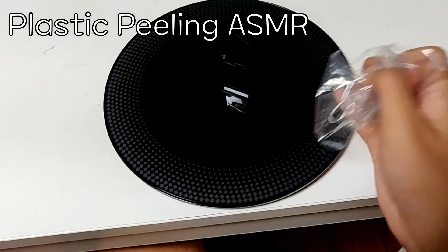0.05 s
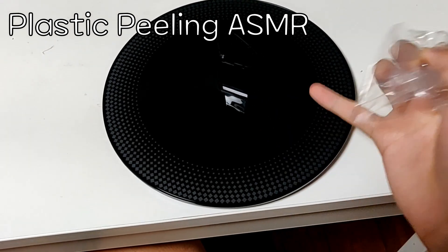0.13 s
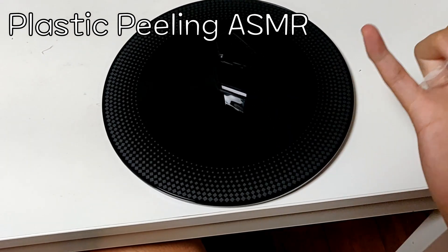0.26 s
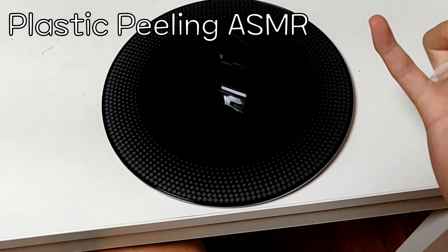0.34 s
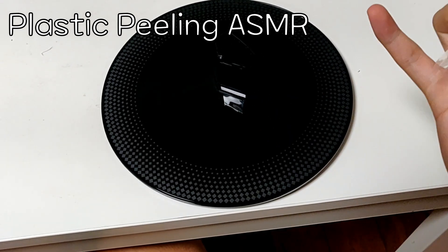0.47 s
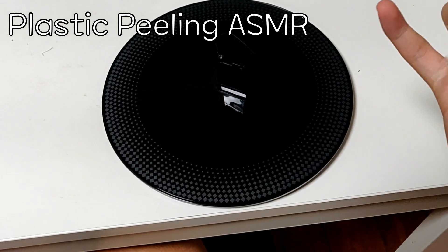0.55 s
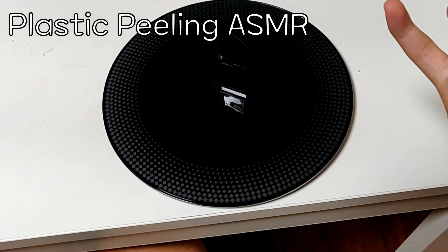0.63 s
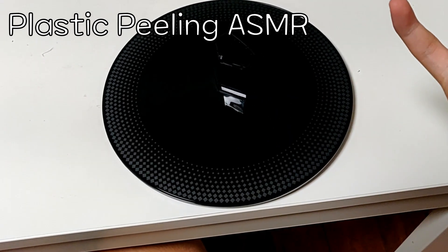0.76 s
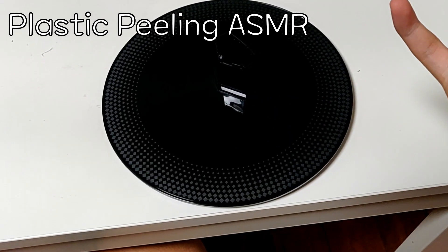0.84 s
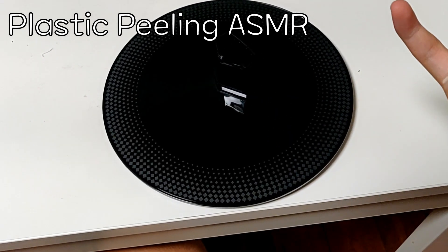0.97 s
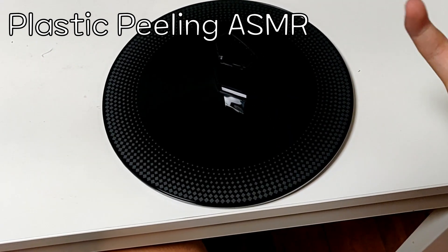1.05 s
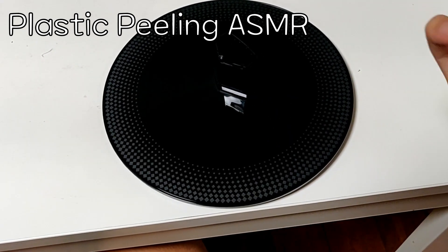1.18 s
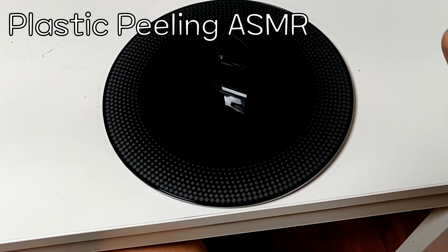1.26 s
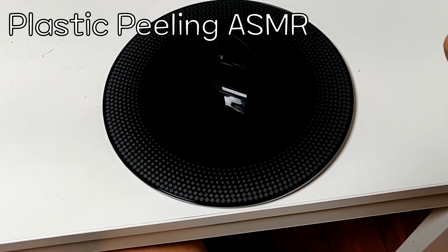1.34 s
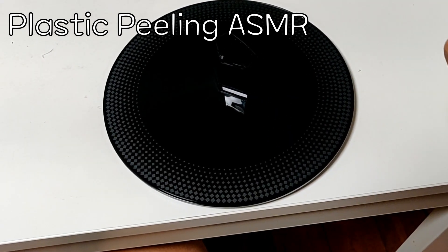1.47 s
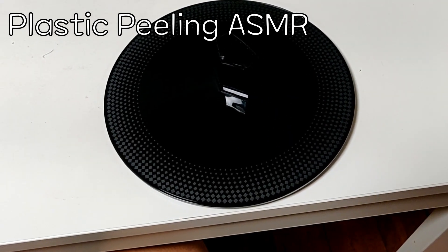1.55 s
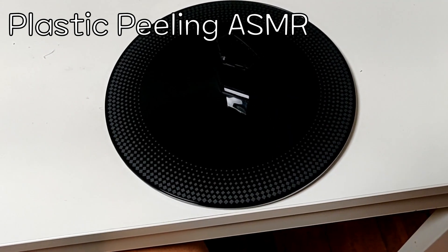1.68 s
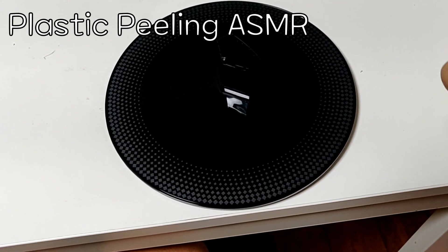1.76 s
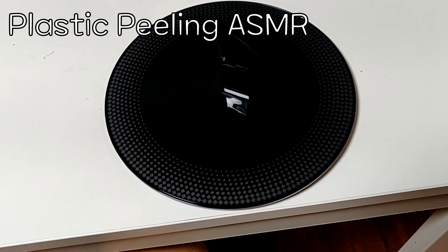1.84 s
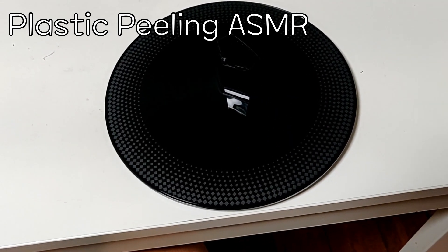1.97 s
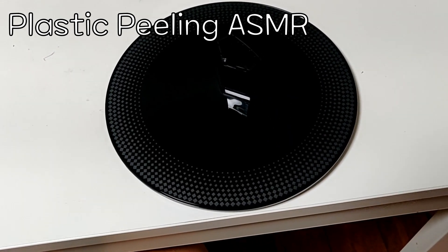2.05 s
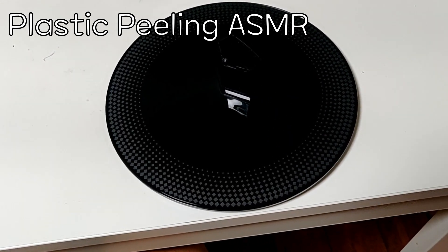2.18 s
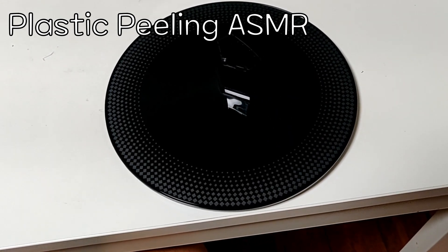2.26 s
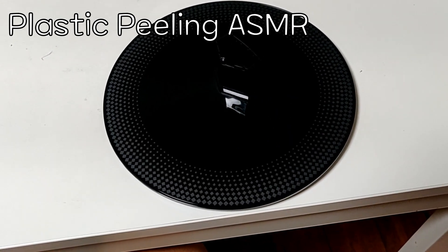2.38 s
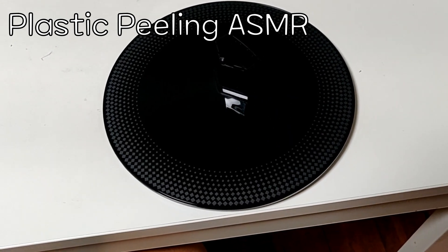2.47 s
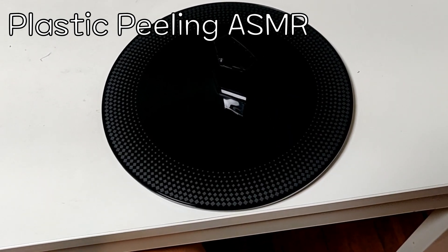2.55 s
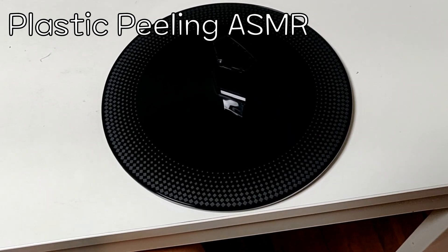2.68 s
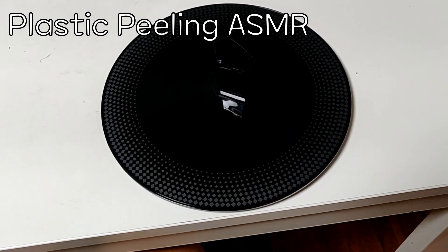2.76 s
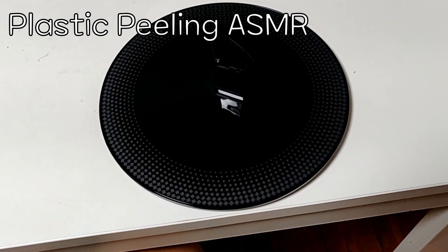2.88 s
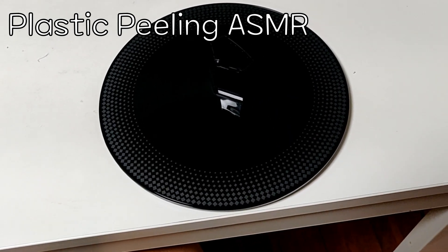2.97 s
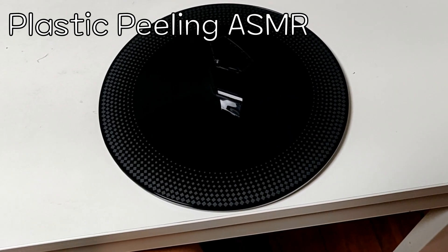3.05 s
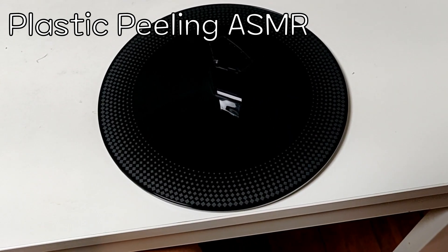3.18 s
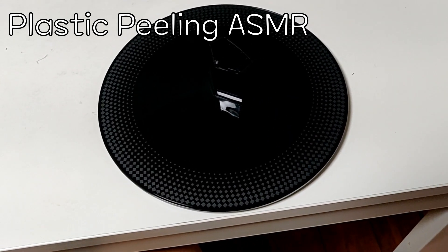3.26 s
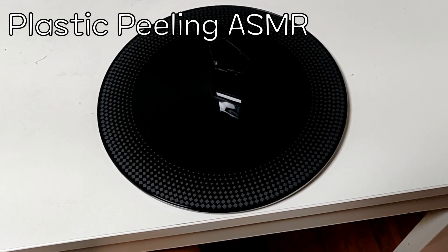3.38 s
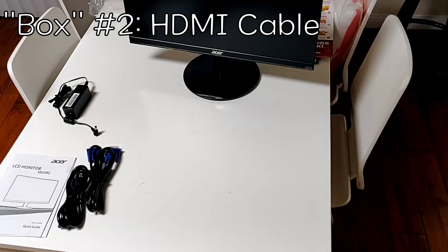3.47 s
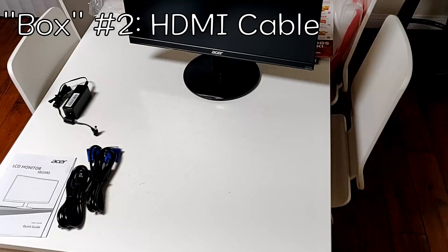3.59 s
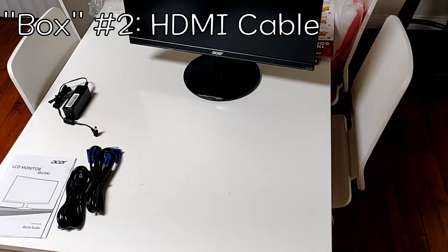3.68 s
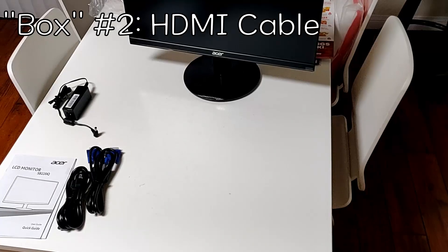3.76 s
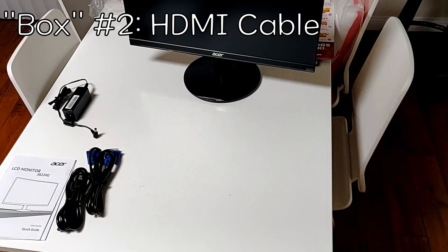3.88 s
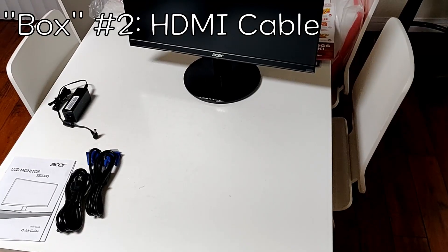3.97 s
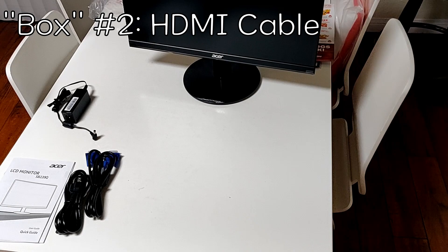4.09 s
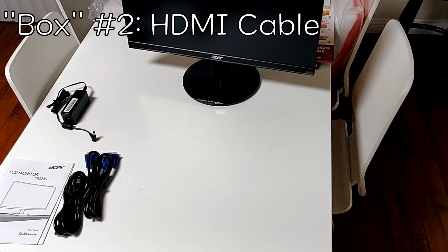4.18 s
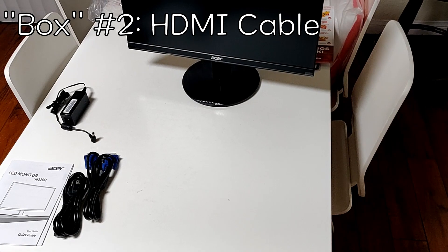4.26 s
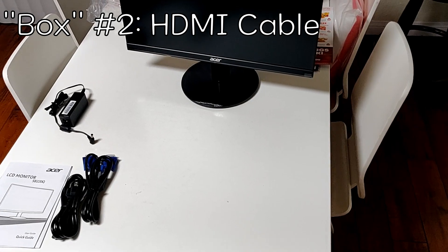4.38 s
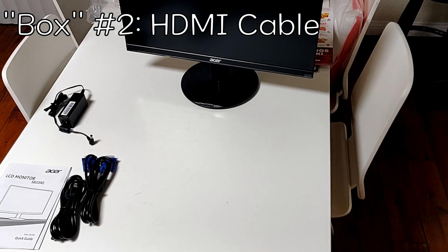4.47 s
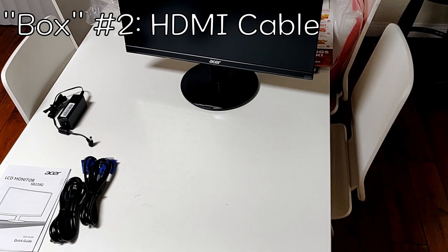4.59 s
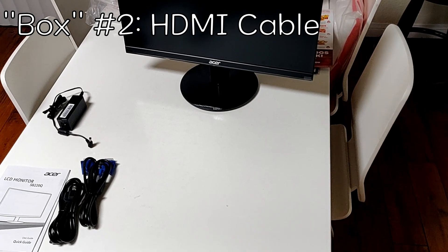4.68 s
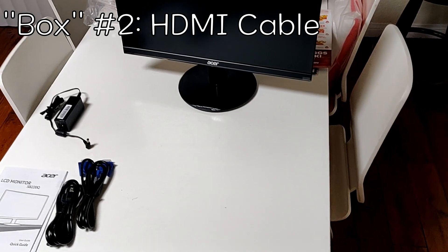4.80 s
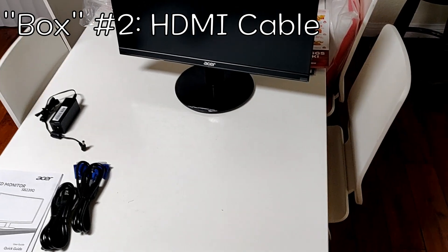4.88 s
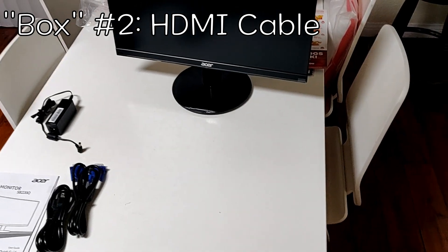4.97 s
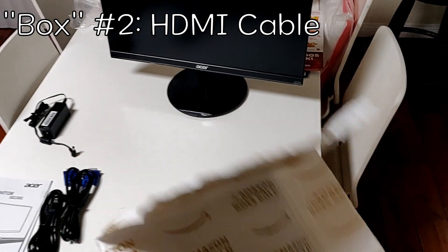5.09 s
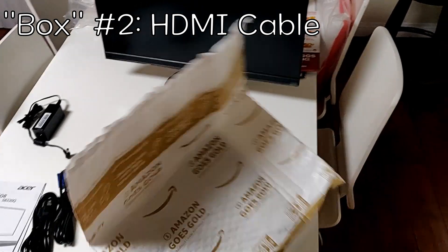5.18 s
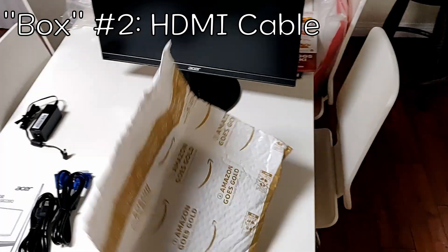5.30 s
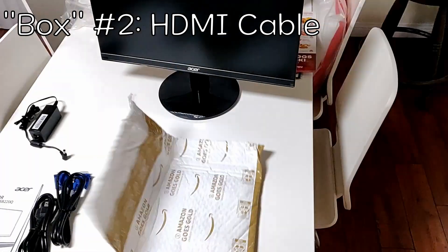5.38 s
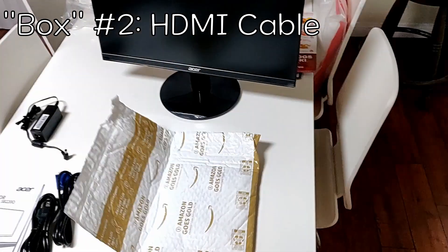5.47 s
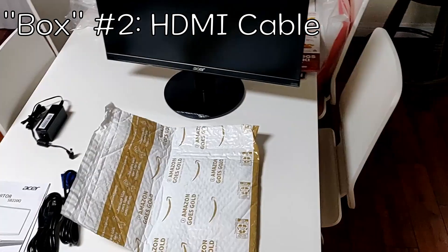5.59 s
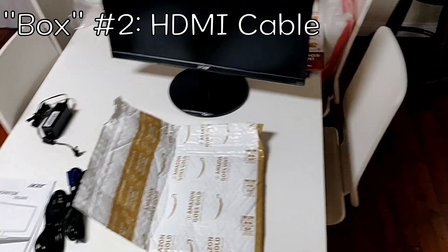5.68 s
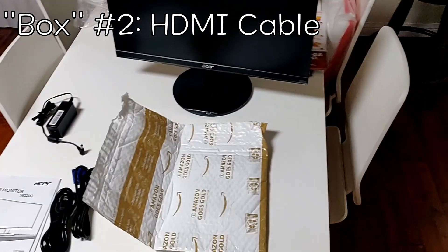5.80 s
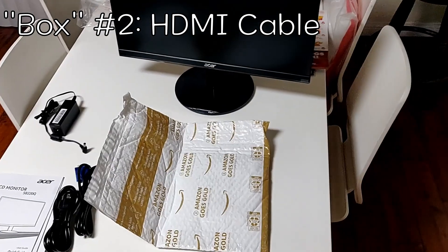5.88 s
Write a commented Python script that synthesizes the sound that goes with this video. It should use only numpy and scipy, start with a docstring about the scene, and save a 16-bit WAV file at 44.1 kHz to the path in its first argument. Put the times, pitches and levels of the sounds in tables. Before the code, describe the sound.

Close, crisp plastic crinkling with sharp snaps and tiny rips, a brief silence, then faint rustling and one flat smack on a tabletop.

```python
"""Clear film is peeled off a glossy plastic stand and crumpled in a hand that ends up by the right microphone.
Each crease snaps with a bright tick and a short ring; quick runs of slips make rips, falling tones make squeaks.
The hand adds dull rubs of noise and soft pushes of air into the microphone ports.
After a short silence, in a live room, a padded envelope rustles as shaped noise and slaps down on a table,
whose top rings as fading tones. Quiet room air lies behind both."""
import sys
import numpy as np
from scipy import signal
from scipy.fft import rfft, irfft, next_fast_len
from scipy.io import wavfile
from scipy.ndimage import uniform_filter1d

SR = 44100
rng = np.random.default_rng(int(sys.argv[2]) if len(sys.argv) > 2 else 0)


def persist_wave(psi):
    """Save psi, clipped to +-1, as 16-bit WAV."""
    counts = np.round(np.clip(psi, -1, 1) * 32767).astype(np.int16)
    wavfile.write(sys.argv[1], SR, np.atleast_2d(counts).T)


N = 261943  # length in samples

# where the film is: (time [s], left over right [dB])
FILM_PLACE = [(0, 10), (1.0, 5.5), (2.07, 7.5), (2.13, -2), (2.45, -2), (2.65, -9.5), (3.4, -1.5)]
# squeezes of the hand, levels before later trims: (time [s], hold [s], ring level [dB], tick level [dB])
HAND_SQUEEZES = [(0.025, 0.048, -41, -43), (0.105, 0.082, -38.5, -38), (0.33, 0.018, -44, -41.5),
                 (0.45, 0.0076, -47, -47.5), (0.6, 0.0083, -54.5, -58), (0.7, 0.21, -72, -67.5),
                 (1.01, 0.012, -65.5, -74.5), (1.122, .07, -46.5, -48), (1.35, 0.073, -44, -46.5),
                 (1.505, 0.0083, -38, -37.5), (1.595, 0.0071, -53, -48), (1.66, 0.16, -48, -46.5),
                 (1.84, 0.099, -40.5, -43), (1.95, 0.026, -37.5, -38), (2.15, 0.069, -45.5, -44),
                 (2.38, 0.017, -46.5, -45), (2.52, 0.088, -53, -52.5), (2.73, 0.0095, -49, -61.5),
                 (3.02, 0.021, -60, -71)]
# spectrum of soft rubbing, only its shape matters: (frequency [Hz], density [dB per Hz])
RUB_SPECTRUM = [(60, -11), (250, 0), (800, -1), (1500, -7), (3000, -22), (9000, -26.5)]
# how alike the two sides of a noise are: (frequency [Hz], likeness [-1 to 1])
SIDE_LIKENESS = [(250, 0.96), (600, 0.49), (1500, 0)]

SILENCE_START_S, SILENCE_END_S = 3.5, 3.595
GRIP_DB_PER_S = 400  # how fast a squeeze builds
SNAP_PAN_DB = 4  # snaps lie a little to the left of the crinkling


def amp(db):
    """Turn decibels into a gain."""
    return 10 ** (np.asarray(db) / 20)


def unit(x):
    """Scale to an average (rms) strength of 1."""
    return x / np.sqrt(np.mean(x ** 2) + 1e-20)


def along(points, hz):
    """Read a (frequency, value) curve on a logarithmic frequency axis."""
    f, v = np.transpose(points)
    return np.interp(np.log(hz + 1), np.log(f + 1), v)


def curves(rows, at):
    """Read each column after the time column at the given times."""
    s, *columns = np.transpose(rows)
    return [np.interp(at, s, column) for column in columns]


def add(track, s, sound):
    """Mix a sound into a track at time s."""
    part = track[..., max(0, round(s * SR)):][..., :sound.shape[-1]]
    part += sound[..., :part.shape[-1]]


def colour(x, points, keep_power=True, size=4096):
    """Filter with the given spectrum, with no sound ahead of its cause."""
    gain = amp(along(points, np.fft.rfftfreq(size, 1 / SR)))
    cepstrum = irfft(np.log(unit(gain) if keep_power else gain))
    # folding the cepstrum forward packs the response as early as it can be
    cepstrum[1:size // 2] *= 2
    cepstrum[size // 2 + 1:] = 0
    response = irfft(np.exp(rfft(cepstrum)))
    return signal.fftconvolve(x, response[None], axes=1)[:, :x.shape[1]]


def pair(alike, size):
    """White noise on both sides, as alike as the curve says at each frequency."""
    likeness = np.clip(along(alike, np.fft.rfftfreq(size, 1 / SR)), -1, 1)
    turn = np.arccos(likeness) / 2
    mid, side = rfft(rng.standard_normal((2, size))) * [np.cos(turn), np.sin(turn)]
    return irfft([mid + side, mid - side], size)


def sides(pan_db):
    """Left and right gains of constant power; positive leans left."""
    ratio = amp(pan_db)
    return np.array([ratio, np.ones_like(ratio)]) * np.sqrt(2 / (1 + ratio ** 2))


def arch(length):
    """Time and a rounded swell over one stroke."""
    t = np.arange(int(length * SR)) / SR
    return t, np.sqrt(np.abs(np.sin(np.pi * t / length)))


def swells(rows, at, rise_db, fall_db, rest_db):
    """Two levels [dB] from strokes (time, hold, level, level) that rise, hold and fall at set dB per second."""
    s, hold, *levels = np.transpose(rows)[:, :, None]
    early = np.maximum(s - at, 0)
    late = np.maximum(at - s - hold, 0)
    shape = -rise_db * early - fall_db * late
    return [10 * np.log10(np.sum(amp(db + shape) ** 2, axis=0) + amp(rest_db) ** 2) for db in levels]


def film():
    """Film creases ring and tick, and its squeaks join them; the cavity of each port then colours the sum."""
    # runs of stick-slip: (time [s], length [s], slips [per s], ring level [dB], ring pitch [Hz],
    # tick level [dB], tick pitch [Hz])
    rip_rows = [(0.077, 0.041, 900, -30, 2258, -29.5, 6280), (0.093, 0.046, 370, -24.5, 1000, -38, 6450),
                (0.36, 0.014, 380, -35, 2600, -38.5, 6520), (0.443, 0.016, 850, -35.5, 1120, -45, 6510),
                (1.128, 0.0097, 890, -38.5, 950, -45, 7110), (1.17, .022, 403, -40, 804, -54, 6567),
                (1.508, 0.041, 580, -33.5, 3600, -47.5, 6550), (1.594, 0.015, 1010, -37, 3313, -37, 6500),
                (1.867, .016, 900, -33, 2147, -42, 9070), (2.125, .016, 980, -53.5, 3000, -27.5, 12480),
                (2.232, 0.014, 580, -44.5, 1600, -33, 11690),
                (2.419, 0.017, 710, -39.5, 1800, -42.5, 11990)]
    # tick spectrum, only its shape matters: (frequency [Hz], density [dB per Hz])
    tick_spectrum = [(300, -28.5), (2000, -3), (6000, -3.5), (10000, -4.5), (16000, 2)]
    # how well the film gives off its ringing: (frequency [Hz], gain [dB])
    radiation_gain = [(150, -9), (600, -4.5), (1400, 1), (2100, 5), (3000, -3), (4200, -2)]
    # cavities of the two ports: (frequency [Hz], gain [dB])
    left_cavity = [(5000, -2), (6300, 7), (8000, -8.5), (9500, -15), (12000, -12.5), (15500, -4)]
    right_cavity = [(5000, 0), (7300, 2.5), (9200, 14.5), (11500, 4.5), (15500, 8)]
    creases = np.hstack([snaps(), strays(), crinkle()] + [rip(*row) for row in rip_rows])
    rings, ticks = facets(*creases)
    sound = colour(rings, radiation_gain, keep_power=False) + colour(ticks, tick_spectrum) + squeaks()
    left = colour(sound[:1], left_cavity, keep_power=False)
    right = colour(sound[1:], right_cavity, keep_power=False)
    return np.vstack([left, right])


def snaps():
    """The clear snaps, where creases pop out one by one, follow the place where the film is held."""
    # levels before colouring: (time [s], ring level [dB], ring pitch [Hz], tick level [dB], tick pitch [Hz])
    snap_rows = [(0.024, -53.5, 4930, -40.5, 6460), (0.071, -44, 3850, -37, 10830),
                 (0.0835, -38, 2200, -24, 13000), (0.206, -39.5, 2130, -30, 6950),
                 (0.291, -44, 2260, -38.5, 6544), (0.3006, -33.5, 5060, -44.5, 5880),
                 (0.3334, -42.5, 2240, -36, 6900), (0.348, -29.5, 2240, -28.5, 6540),
                 (0.3633, -25.5, 3470, -21.5, 9440), (0.3654, -36.5, 2270, -32.5, 12620),
                 (0.4401, -27, 1060, -32.5, 13050), (0.5961, -40.5, 2950, -43, 7800),
                 (0.605, -39, 2050, -42, 8030), (0.726, -42, 3470, -37, 9160),
                 (0.837, -44, 3190, -56, 10530), (0.9866, -43.5, 3470, -46.5, 12880),
                 (1.0701, -38, 3100, -44, 9610), (1.1263, -33, 2050, -33.5, 13700),
                 (1.1348, -27.5, 3620, -44, 7210), (1.137, -29.5, 873, -51, 6980),
                 (1.1766, -36, 1700, -42, 11060), (1.1883, -43, 2683, -41, 13600),
                 (1.239, -44, 2020, -39, 6100), (1.3123, -36.5, 2070, -34, 9480),
                 (1.3402, -36.5, 2990, -45.5, 9010), (1.366, -35.5, 3600, -36.5, 7700),
                 (1.4023, -47.5, 2050, -36, 7680), (1.413, -35, 2350, -48, 6830),
                 (1.4197, -27, 2930, -33.5, 13070), (1.4249, -37, 2820, -30.5, 14480),
                 (1.4309, -34, 2890, -44.5, 11400), (1.4676, -35.5, 1940, -33, 8850),
                 (1.4884, -34.5, 1250, -29, 9655), (1.524, -28, 2710, -28, 5620),
                 (1.526, -30, 968, -45.5, 7000), (1.572, -53, 4740, -28, 14300),
                 (1.742, -36.5, 2200, -37.5, 8990), (1.841, -33, 1740, -32.5, 8810),
                 (1.8485, -32.5, 2090, -35, 12500), (1.8845, -19.5, 1890, -38, 5615),
                 (1.8995, -25, 1890, -30.5, 12460), (1.9551, -27, 2450, -35, 8040),
                 (1.9848, -34, 2296, -33.5, 12310), (2.0053, -31, 2170, -38.5, 11300),
                 (2.06, -36, 1890, -37.5, 11000), (2.0755, -40, 5480, -41, 5770),
                 (2.0921, -40.5, 2110, -27.5, 9400), (2.1451, -40.5, 1870, -25, 10800),
                 (2.2057, -46, 3830, -34, 9750), (2.2544, -57, 3400, -32, 8700),
                 (2.2801, -52.5, 3410, -40, 8900), (2.3046, -39, 1850, -34, 6810),
                 (2.3117, -44.5, 4900, -34.5, 13690), (2.3252, -35, 4540, -33.5, 6520),
                 (2.3411, -47.5, 2930, -32, 13620), (2.3774, -52, 2500, -34, 12800),
                 (2.3963, -33.5, 2220, -46.5, 11060), (2.4161, -40, 1700, -38.5, 15290),
                 (2.5017, -42, 3140, -37, 7410), (2.543, -37, 1680, -39.5, 9110),
                 (2.554, -36.5, 3770, -46, 6130), (2.562, -39.5, 4310, -42, 6795),
                 (2.5823, -37, 4480, -33, 9900), (2.6038, -28, 2200, -37, 8930),
                 (2.631, -39.5, 5360, -38.5, 7130), (2.6784, -34, 2390, -32.5, 13540),
                 (2.8089, -39.5, 2200, -41.5, 14030), (2.8311, -57, 3170, -48.5, 7410),
                 (2.8618, -45.5, 2150, -46.5, 7290), (2.869, -39.5, 1210, -45.5, 8560),
                 (2.8861, -50, 2110, -53.5, 6200), (2.9589, -50, 4740, -35, 15000),
                 (3.0173, -43, 1700, -43, 14470), (3.045, -32, 1290, -32, 13800),
                 (3.1394, -59.5, 3190, -57, 7820), (3.3266, -46, 2200, -51.5, 10900),
                 (3.3969, -53.5, 3980, -55.5, 6100)]
    columns = np.transpose(snap_rows)
    pan = curves(FILM_PLACE, columns[0])[0] + SNAP_PAN_DB
    return np.vstack([columns, pan])


def strays(follow=0.74, pivot_db=-45, boost_db=1, tick_db=1.5, spread_db=2.5,
           centre_hz=2600, tick_hz=8500, spread=0.34, count=90):
    """Middling creases flip at scattered times, louder during and after each squeeze."""
    s = (np.arange(count) + rng.random(count)) * SILENCE_START_S / count
    size, bright, pitch, tick_pitch = np.clip(rng.standard_normal((4, count)), -2, 2)
    # these larger creases go on springing back for longer than the tiny ones
    effort = np.array(swells(HAND_SQUEEZES, s, GRIP_DB_PER_S, fall_db=97.5, rest_db=-71))
    ring, tick = pivot_db + follow * (effort - pivot_db) + boost_db
    pan = curves(FILM_PLACE, s)[0] + SNAP_PAN_DB
    return np.array([s, ring + spread_db * size, centre_hz * np.exp(spread * pitch),
                     tick + tick_db + spread_db * bright, tick_hz * np.exp(spread * tick_pitch), pan])


def crinkle(ring_db=-2, tick_db=-3, spread_db=1.5, centre_hz=2400, tick_hz=9000, spread=.42, count=1400):
    """A crowd of tiny creases flips, as loud as the hand squeezes."""
    s = (np.arange(count) + rng.uniform(0, 2.2, count)) * SILENCE_START_S / count
    size, bright, pitch, tick_pitch = rng.standard_normal((4, count))
    # the film is never quite still, so the level has a floor
    ring, tick = swells(HAND_SQUEEZES, s, GRIP_DB_PER_S, fall_db=148, rest_db=-76.5)
    size = spread_db * np.minimum(size, 2) - spread_db
    return np.array([s, ring + ring_db + size, centre_hz * np.exp(spread * pitch),
                     tick + tick_db + size + 2 * bright, tick_hz * np.exp(spread * tick_pitch),
                     curves(FILM_PLACE, s)[0]])


def rip(start, length, rate, ring_db, ring_hz, tick_db, tick_hz, jitter=.22, drop_db=-4, spread=0.32, count=80):
    """The film sticks and lets go in a quick, uneven run of slips."""
    gap, size, pitch = rng.standard_normal((3, count))
    t = np.cumsum(np.exp(jitter * gap)) / rate
    swell = drop_db + 2 * size + 10 * np.log10(np.abs(np.sin(np.pi * t / length)) + .01)
    detune = np.exp(spread * pitch)
    slips = [start + t, ring_db + swell, ring_hz * detune,
             tick_db + swell, tick_hz * np.sqrt(detune), curves(FILM_PLACE, start + t)[0]]
    return np.array(slips)[:, t < length]


def facets(s, ring_db, ring_hz, tick_db, tick_hz, pan_db, cycles=17, tick_t60=0.003, flutter=0.78,
           sheet_db=-19, sheet_t60=0.049, lag=.00035, bend=0.89, settle=0.00015, flip=0.00013,
           focus=1.7, width_hz=2200, size=640):
    """Each facet flips with a bright tick, rings briefly and shakes the sheet; gives stereo rings and ticks."""
    # spectrum of the noisy part of the ring, only its shape matters: (frequency [Hz], density [dB per Hz])
    film_spectrum = [(150, -21.5), (500, -14), (1000, -2), (2000, -10.5), (3500, 5), (5500, -10),
                     (8000, -14), (16000, -29)]
    t = np.arange(size) / SR
    noise = rng.standard_normal((len(s), 4, size))
    sheet = amp(sheet_db - 60 * t / sheet_t60)
    onset = 1 - np.exp(-(t / flip) ** 2)

    def level(wave, db):
        """Give each wave the energy that its level would have over 4 ms."""
        wave = wave * onset
        return wave * (amp(db) * np.sqrt(.004 * SR / np.sum(wave ** 2, axis=1)))[:, None]

    # a facet rings for a set number of cycles, so the large, low ones last longer
    fade = amp(-60 * t * ring_hz[:, None] / cycles)
    # short bending waves run ahead, so the ring starts sharp and settles
    bent_time = t + bend * settle * (1 - np.exp(-t / settle))
    tone = np.sin(2 * np.pi * ring_hz[:, None] * bent_time) * fade
    # the size of the facet sets where its tick is brightest
    offset = (np.fft.rfftfreq(size, 1 / SR) - tick_hz[:, None]) / width_hz
    brightness = 1 + focus * np.exp(-offset ** 2)
    rings, ticks = np.zeros((2, N)), np.zeros((2, N))
    for port, gain in enumerate(sides(pan_db)):
        ring = tone + flutter * colour(noise[:, port], film_spectrum) * (fade + sheet)
        tick = irfft(rfft(noise[:, 2 + port]) * brightness) * (amp(-60 * t / tick_t60) + sheet / 2)
        # the left port is the farther one
        first = np.round(np.abs(s + lag * (1 - port)) * SR).astype(int)
        index = (first[:, None] + np.arange(size)).ravel()
        rings[port] = np.bincount(index, (level(ring, ring_db) * gain[:, None]).ravel(), N)[:N]
        ticks[port] = np.bincount(index, (level(tick, tick_db) * gain[:, None]).ravel(), N)[:N]
    return rings, ticks


def squeaks(rough=.08, judder_db=2.0):
    """Film judders under the fingers in short falling chirps with unsteady pitch and strength."""
    # film on skin, levels before the other shaping: (time [s], length [s], start pitch [Hz], end pitch [Hz],
    # level [dB], third harmonic against the first [dB], the second having half of that)
    squeak_rows = [(2.181, 0.03, 4227, 3400, -39, -27), (2.233, 0.016, 887, 735, -32.5, -29),
                   (2.243, .019, 818, 669, -34, -29.5)]
    out = np.zeros((2, N))
    for s, length, start_hz, end_hz, db, overtone_db in squeak_rows:
        t, swell = arch(length)
        waver, grip = unit(uniform_filter1d(rng.standard_normal((2, len(t))), size=60))
        glide = start_hz * (end_hz / start_hz) ** (t / length)
        phase = 2 * np.pi * np.cumsum(glide * (1 + rough * waver * np.sqrt(800 / start_hz))) / SR
        tone = sum(amp(overtone_db * k / 2) * np.sin((k + 1) * phase) for k in range(3))
        judder = unit(amp(judder_db * grip))
        add(out, s, amp(db) * swell * judder * tone * sides(pan_db=-10.0)[:, None])
    return out


def hand(rise=0.17):
    """The hand makes dull rubs from shaped noise, and its bumps push air into a port as single slow pulses."""
    # soft bumps, levels before filtering: (time [s], level [dB], push [s], left over right [dB])
    bump_rows = [(2.437, -25, 0.0011, -18), (2.6587, -2.5, .0011, -30), (2.74, -23.5, 0.0025, -29),
                 (3.786, -33.5, 0.0055, 10)]
    # soft rubbing, levels before the swell: (time [s], length [s], level [dB])
    rub_rows = [(0.058, 0.17, -47.5), (1.087, 0.15, -54.5), (2.7, 0.14, -58.5), (2.976, 0.046, -52),
                (3.021, 0.055, -49.5), (3.241, 0.062, -55), (3.307, 0.038, -55), (3.397, 0.026, -55)]
    bumps, rubbing = np.zeros((2, N)), np.zeros(N)
    t = np.arange(SR // 20) / SR
    for s, db, push, pan_db in bump_rows:
        pulse = (t / push - 1) * np.exp(-t / push) * (1 - np.exp(-t / (rise * push)))
        add(bumps, s, amp(db) * pulse * sides(pan_db)[:, None])
    for s, length, db in rub_rows:
        add(rubbing, s, amp(db) * arch(length)[1])
    pushes = colour(bumps, [(20, -5), (60, -14.5), (150, -3.0)], keep_power=False)
    return pushes + rubbing * colour(pair(SIDE_LIKENESS, N), RUB_SPECTRUM)


def carried(grain_db=4.0):
    """The padded envelope bends as it is picked up and swung in: dull flexing, bright rustle and crackles."""
    # bends, levels before later trims: (time [s], hold [s], flexing level [dB], rustle level [dB])
    bend_rows = [(4.61, 0.16, -76, -77.5), (4.77, 0.063, -63, -70.5), (4.845, 0.007, -58, -56.5),
                 (4.878, 0.037, -72, -60), (5.088, 0.018, -50.5, -59), (5.14, 0.0194, -47, -50.5),
                 (5.27, 0.0396, -59, -54.5)]
    # rustle spectrum, only its shape matters: (frequency [Hz], density [dB per Hz])
    rustle_spectrum = [(880, -53), (1500, -2), (5380, -2.5), (6370, 1.5), (7690, -8), (8660, 0.5),
                       (10900, -11), (15100, -7), (16000, -19)]
    # crackles: (time [s], ring level [dB], pitch of ring and tick [Hz])
    crackle_rows = [(4.877, -47, 4800), (5.032, -54.5, 6020), (5.085, -56, 1190), (5.143, -49, 1300),
                    (5.913, -57.5, 6340)]
    t = np.arange(N) / SR
    flex_db, rustle_db = swells(bend_rows, t, rise_db=900, fall_db=128, rest_db=-100)
    # slow noise makes the level grainy
    grain = unit(amp(grain_db * unit(uniform_filter1d(rng.standard_normal(N), 200))))
    flex = amp(flex_db - 5.5) * colour(pair(SIDE_LIKENESS, N), RUB_SPECTRUM)
    rustle = amp(rustle_db - 1.0) * colour(pair(SIDE_LIKENESS, N), rustle_spectrum)
    s, db, hz = np.transpose(crackle_rows)
    rings, ticks = facets(s, db, hz, db + 1.5, hz, np.zeros(len(s)), cycles=8, bend=0.075, flutter=0.5)
    return (flex + rustle) * grain + rings + ticks


def landing(attack=0.0018, table_db=-2, grain_db=3):
    """The envelope slaps flat, squeezes out a thump of air and rings the table top."""
    # the envelope landing, edge first: (time [s], level [dB], slap and thump 60 dB decay [s],
    # thump and table against the slap, before trims [dB])
    landing_rows = [(5.376, -39.5, 0.11, -4), (5.388, -36, 0.3, -11.5), (5.433, -13, 0.056, -1.5),
                    (5.456, -24.5, 0.15, 1.5)]
    # slap spectrum, only its shape matters: (frequency [Hz], density [dB per Hz])
    slap_spectrum = [(180, -30.5), (300, -18), (528, -17.5), (624, -16), (762, -8), (828, -10.5),
                     (1230, -15), (1390, -11.5), (3890, -20), (5250, -21.5), (6300, -16.5), (7570, -23.5),
                     (8500, -19), (16000, -30.5)]
    # tones of the table top, levels among themselves: (frequency [Hz], level [dB], 60 dB decay [s])
    table_modes = [(144.2, -13.5, 0.6), (201.4, -13, 0.33), (256, -15, 0.137), (283, 1.5, 0.18),
                   (318, -3, 0.072), (406.4, -6.5, 0.34), (490, -19, .1), (618, -2, 0.1), (774, -1, 0.067),
                   (872, 1, 0.081), (1050, 8.5, 0.038), (1156, 3, 0.051), (1254, 4, 0.062)]
    # thump spectrum: (frequency [Hz], density [dB per Hz])
    thump_spectrum = [(30, -20), (100, -11.5), (140, -6), (200, -3), (300, -2), (450, -9.5), (1000, -19),
                      (4000, -55)]
    out, t = np.zeros((2, N)), np.arange(SR // 2) / SR
    for s, db, t60, thump_db in landing_rows:
        # the wrinkled skin meets the table patch by patch
        grain = unit(amp(grain_db * unit(uniform_filter1d(rng.standard_normal(len(t)), size=50))))
        slap = colour(pair(SIDE_LIKENESS, len(t)) * grain, slap_spectrum)
        thump = colour(pair(SIDE_LIKENESS, len(t)), thump_spectrum)
        wood = sum(amp(level - 60 * t / life) * np.sin(2 * np.pi * (hz * t + rng.random()))
                   for hz, level, life in table_modes)
        wood = amp(table_db + thump_db) * wood / np.linalg.norm(amp(np.transpose(table_modes)[1]))
        hit = (slap + amp(thump_db) * thump) * amp(-60 * t / t60) + wood
        add(out, s, amp(db) * (1 - np.exp(-t / attack)) * hit)
    return out


def room(x, delay=0.0037):
    """The walls answer with a tail of noise that dies at its own speed at each frequency."""
    # room echo: (frequency [Hz], 60 dB decay [s])
    room_decay = [(150, 0.37), (1000, 0.65), (5000, 0.68), (15000, 0.46)]
    hz, t, z = signal.stft(pair(SIDE_LIKENESS, SR * 3 // 4), SR, nperseg=256)
    fade = amp(-60 * t / along(room_decay, hz)[:, None])
    tail = signal.istft(z * fade, SR, nperseg=256)[1]
    tail[:, :int(delay * SR)] = 0
    return signal.fftconvolve(x, tail / np.linalg.norm(tail[0]), axes=1)[:, :N]


def air(near_db=-63.5, far_db=-63, grows_db_per_s=2.17, fade_s=0.085):
    """Room air is steady shaped noise that cuts out for the silence, fades back in and slowly grows."""
    # air spectrum, only its shape matters: (frequency [Hz], density [dB per Hz])
    air_spectrum = [(20, 0), (45, -10), (92, -7), (130, -6), (200, -5.5), (280, -7.5), (360, -7),
                    (520, -14), (700, -17), (900, -20), (1600, -27.5), (2600, -33), (16000, -37.5)]
    # how alike the two sides are: (frequency [Hz], likeness [-1 to 1])
    air_likeness = [(60, 0.3), (240, 0.8), (950, 0.093), (3770, -0.4), (15000, -0.3)]
    t = np.arange(N) / SR
    since = np.maximum(t - SILENCE_END_S, 0)
    before = amp(near_db) * (t < SILENCE_START_S)
    after = amp(far_db + grows_db_per_s * since) * (1 - np.exp(-since / fade_s))
    return (before + after) * colour(pair(air_likeness, N), air_spectrum)


def scene():
    """Close, dry film; a short silence; the envelope farther off in the room."""
    t = np.arange(N) / SR
    near, far = film() + hand(), carried() + landing()
    # the room falls back as the hand comes up to the microphone
    drier = amp(np.interp(t, (2.2, 3.2), [0, -9.5]))
    # the hand shields the room from the highest ticks
    spill = colour(near * drier, [(3000, 0.5), (8000, 2), (14000, -8.0)], keep_power=False)
    close = near + amp(-16.0) * room(spill) * (t < SILENCE_START_S)
    distant = (far + amp(-2.5) * room(far)) * (t > SILENCE_END_S)
    return close + distant + air()


def record(dry, top_hz=16100):
    """Keep nothing from the top frequency upward."""
    size = next_fast_len(N + SR // 2)
    kept = np.fft.rfftfreq(size, 1 / SR) < top_hz
    return irfft(rfft(dry, size) * kept, size)[:, :N]


dry = scene()
out = record(dry)
persist_wave(out)
```